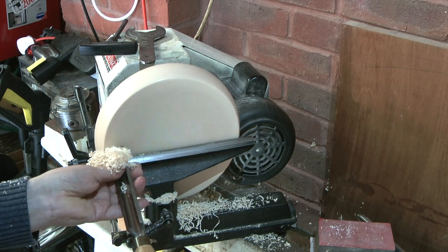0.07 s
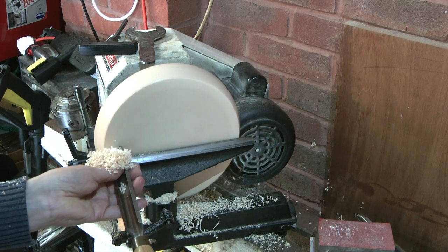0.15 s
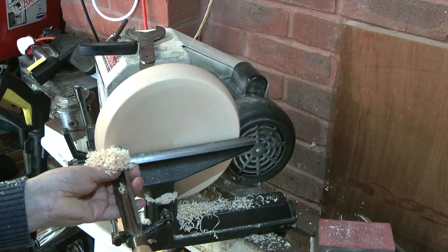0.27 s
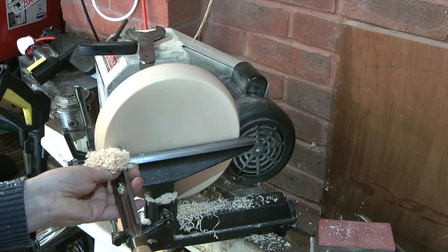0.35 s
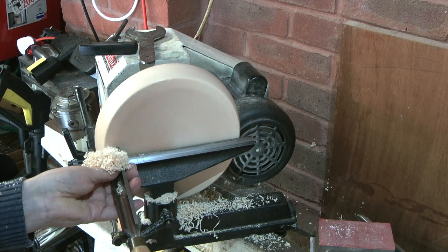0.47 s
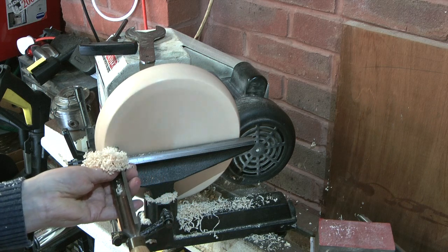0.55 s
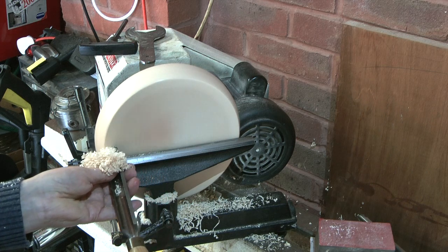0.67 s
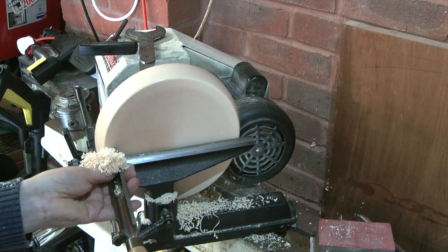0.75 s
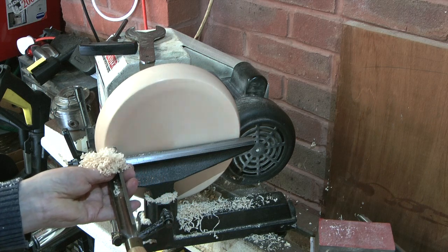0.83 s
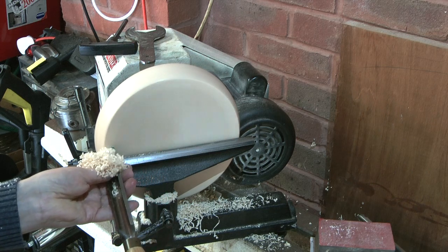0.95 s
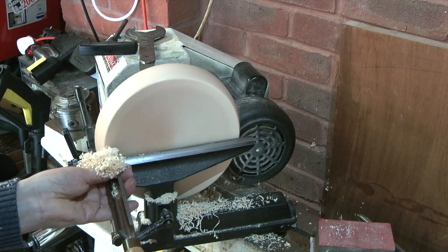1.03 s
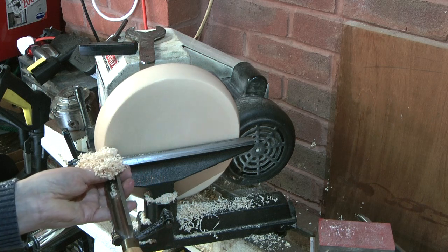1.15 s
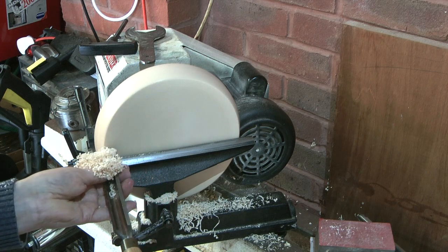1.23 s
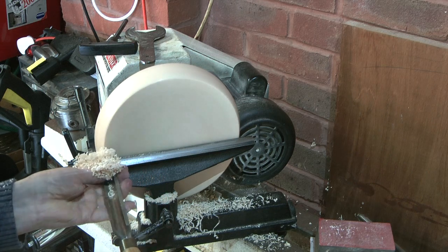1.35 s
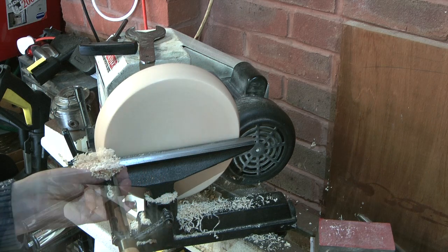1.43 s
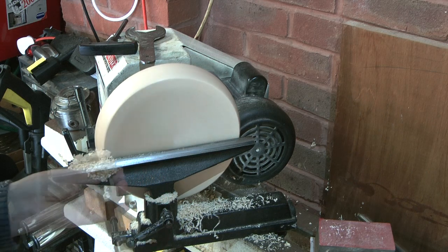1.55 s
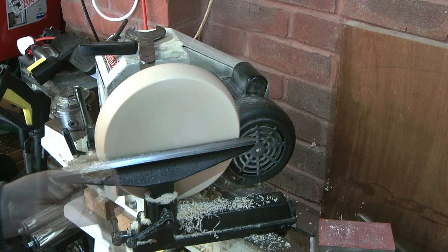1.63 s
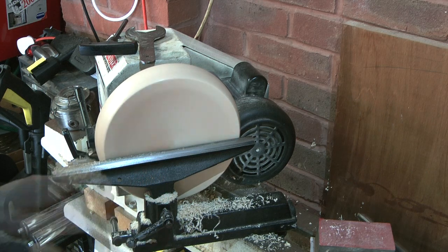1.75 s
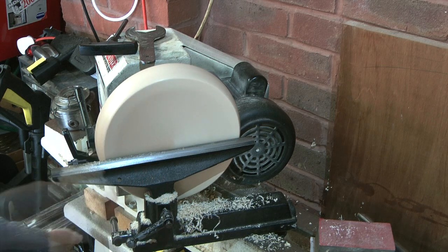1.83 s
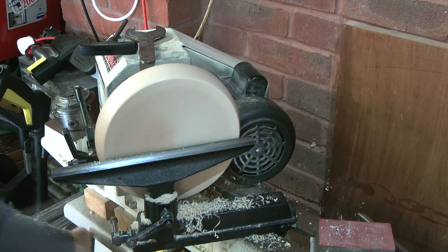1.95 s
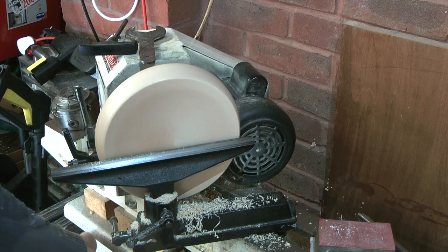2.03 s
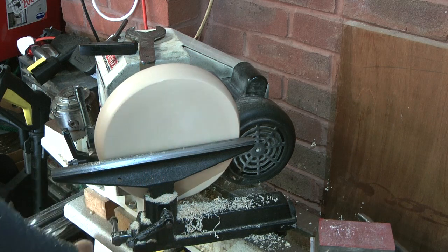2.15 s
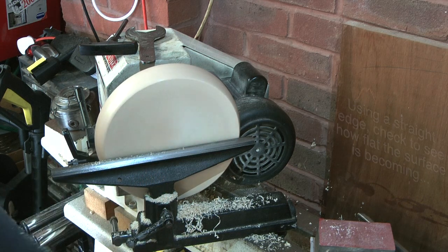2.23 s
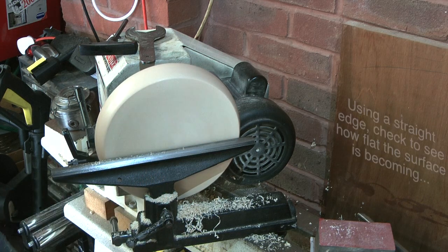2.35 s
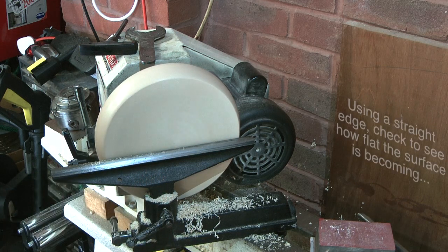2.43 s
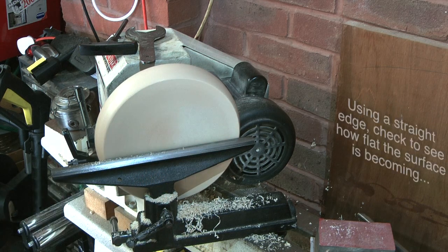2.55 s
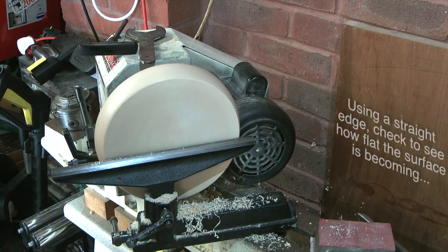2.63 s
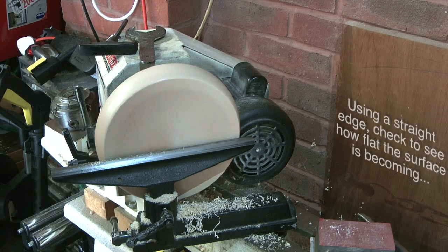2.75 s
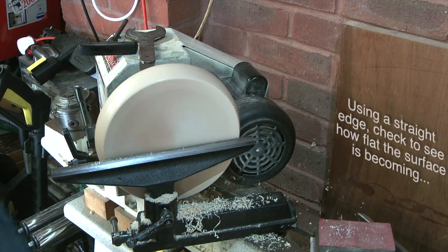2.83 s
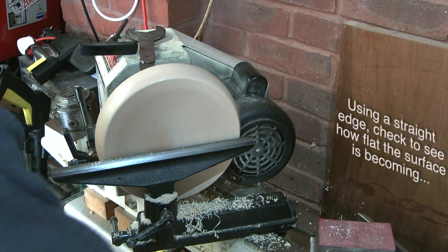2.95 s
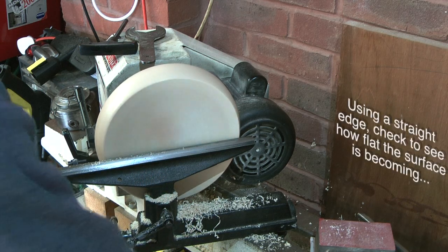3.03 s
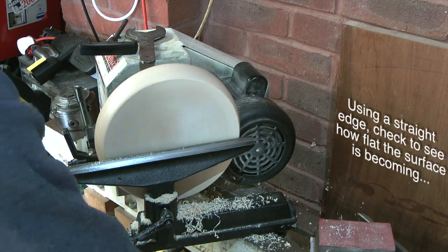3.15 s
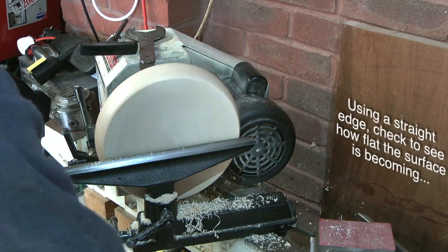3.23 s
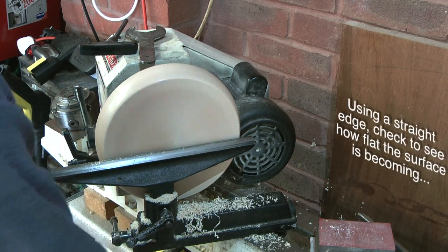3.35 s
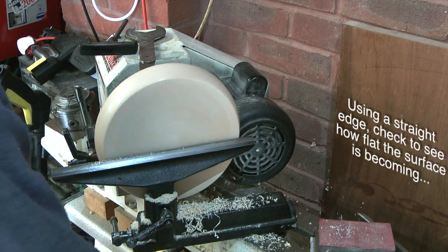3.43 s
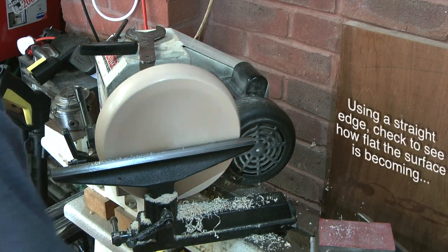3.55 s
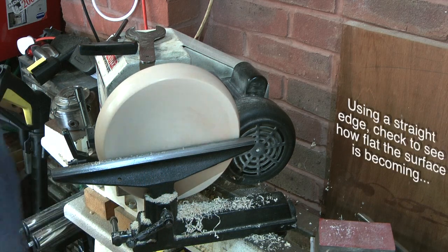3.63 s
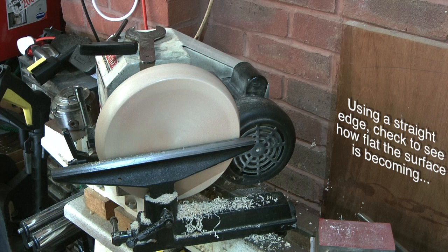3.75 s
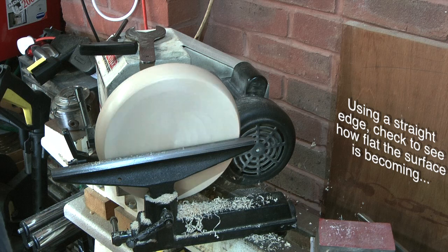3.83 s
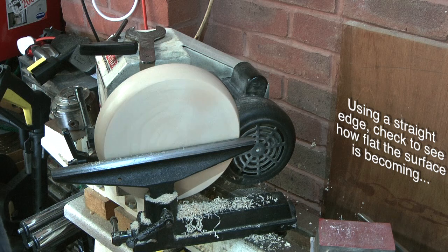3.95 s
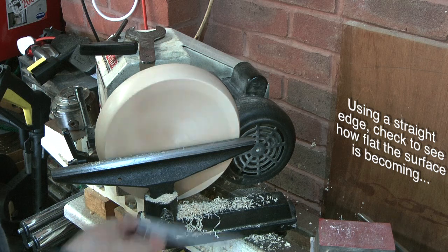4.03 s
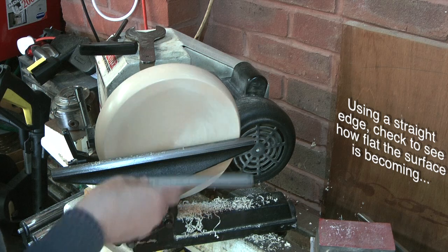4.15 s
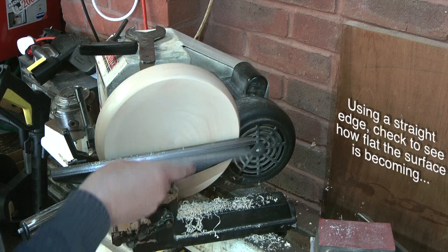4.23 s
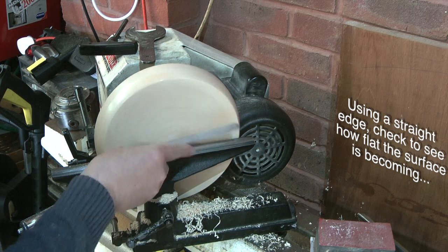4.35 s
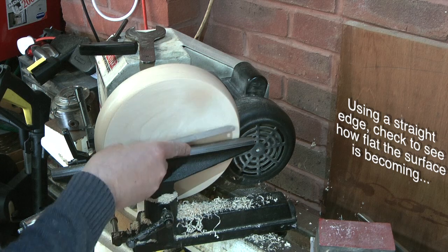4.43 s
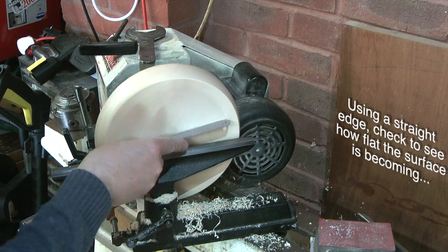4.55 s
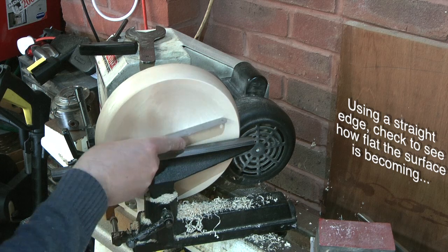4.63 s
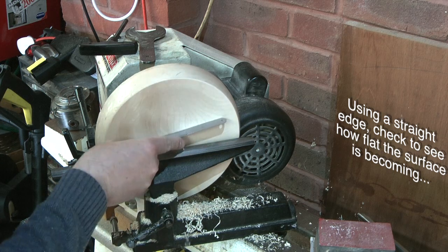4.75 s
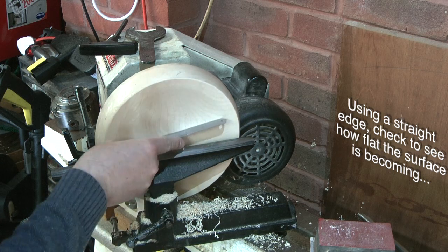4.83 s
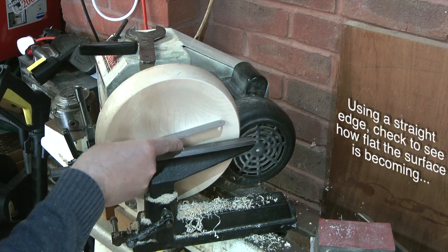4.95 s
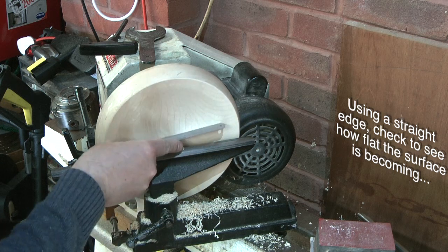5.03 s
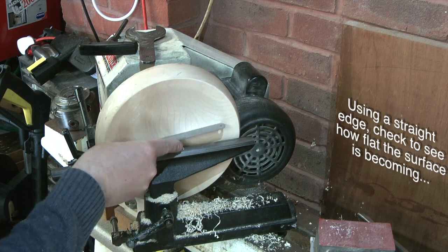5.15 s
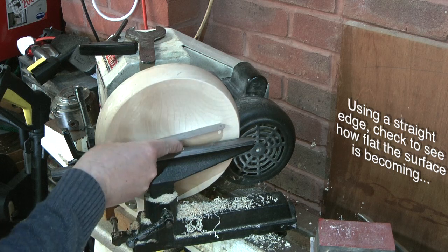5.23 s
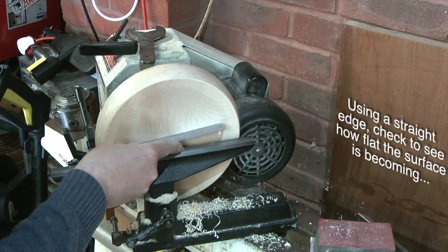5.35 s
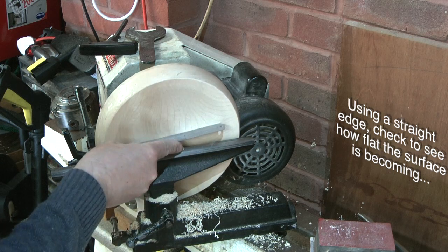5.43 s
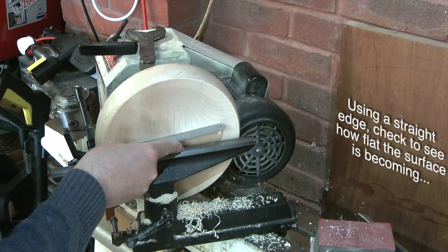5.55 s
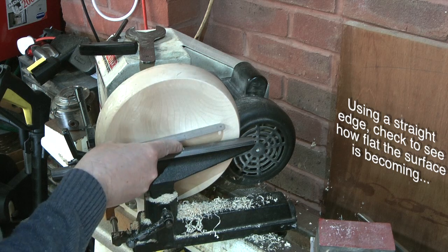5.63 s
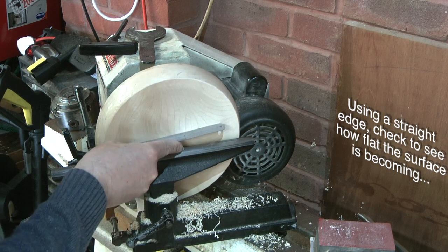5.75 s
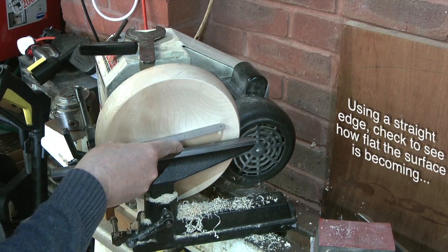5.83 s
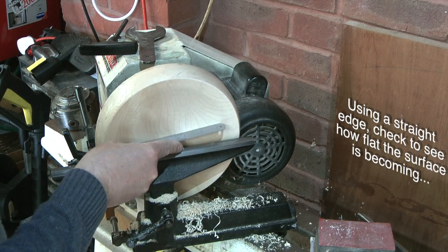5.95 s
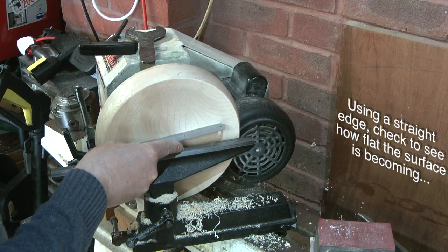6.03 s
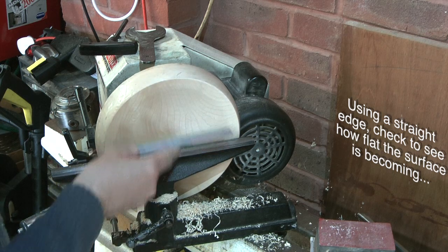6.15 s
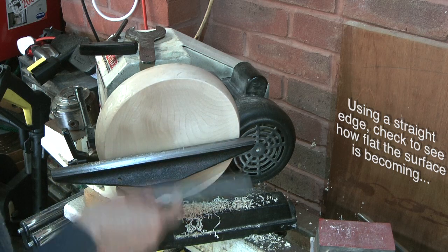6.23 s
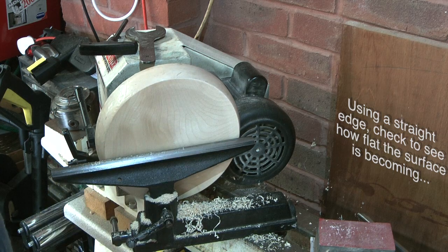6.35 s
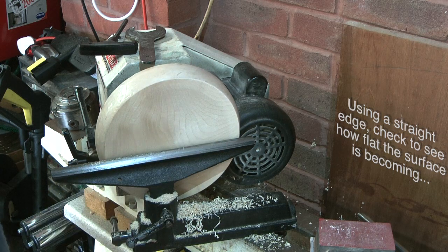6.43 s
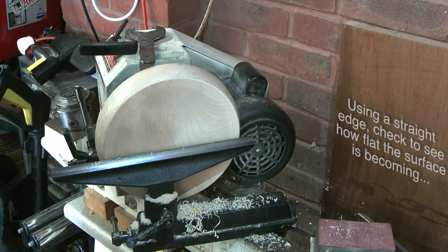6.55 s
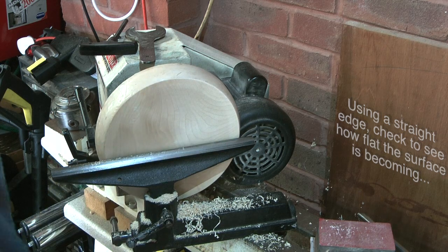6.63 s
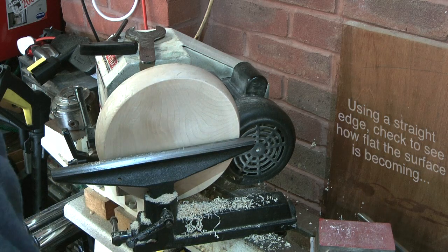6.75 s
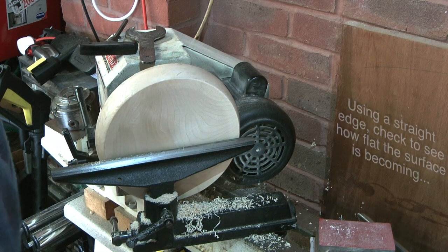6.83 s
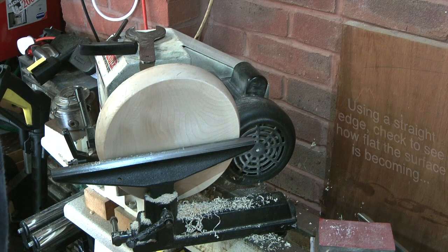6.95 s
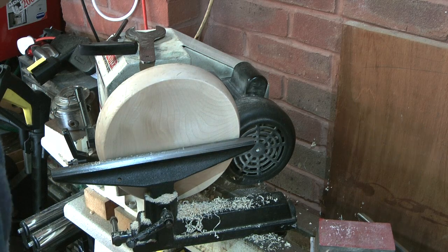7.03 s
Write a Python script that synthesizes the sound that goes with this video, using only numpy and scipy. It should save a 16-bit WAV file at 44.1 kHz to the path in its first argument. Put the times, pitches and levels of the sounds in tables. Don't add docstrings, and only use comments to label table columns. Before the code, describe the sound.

In a small brick workshop, close by, a mains motor hums and rattles while a gouge rips a spinning disc in rapid crisp pulses. Cutting stops, a sleeve brushes the bench, and a switch snaps. The rotor coasts down with falling whines and rumble; a metallic clack begins scrapes that space out until it stops. A steel rule slides and knocks softly on wood, then clatters brightly as it is put away over faint traffic.

```python
import sys
import numpy as np
from scipy import signal
from scipy.fft import rfft, irfft, next_fast_len
from scipy.io import wavfile

SR = 44100
rng = np.random.default_rng(int(sys.argv[2]) if len(sys.argv) > 2 else 0)


def how_loud(loudness_db):
    steps = np.asarray(loudness_db, float) / 20
    return 10 ** steps


def put_to_file(sound):
    columns = np.atleast_2d(sound).T
    safe = np.clip(columns, -1, 1)
    whole_steps = np.round(safe * 32767)
    wavfile.write(sys.argv[1], SR, whole_steps.astype(np.int16))


N = 312228
TIME = np.arange(N) / SR
HZ = np.maximum(np.arange(N // 2 + 1) * SR / N, 1)
OFF_S, DROP_S = 2.25, 2.953
RUN_TURNS_PER_S = 23.1


def noise():
    return rng.standard_normal(N)


def rms_one(x):
    return x / np.sqrt(np.mean(x ** 2) + 1e-20)


def in_time(rows):
    s, *columns = np.transpose(rows)
    return [np.interp(TIME, s, c, left=-120, right=-120) for c in columns]


def at_hz(points, hz):
    point_hz, value = np.transpose(points)
    return np.interp(np.log(hz), np.log(point_hz), value)


def drift(rate_hz):
    r = np.exp(-2 * np.pi * rate_hz / SR)
    return rms_one(signal.lfilter([1], [1, -2 * r, r * r], rng.standard_normal(N + SR))[SR:])


def grains(per_s, spread_db):
    size = how_loud(spread_db * np.minimum(rng.exponential(1, N), 4)) * noise()
    return size * (rng.random(N) < per_s / SR)


def colour(x, tone, rings=(), flicker_db=0., rate=20):
    wide = rfft(x) * how_loud(at_hz(tone, HZ))
    out = irfft(wide, N)
    for hz, width_hz, db in rings:
        resonance = 1 / np.hypot(1, 2 * (HZ - hz) / width_hz) ** 2
        out = out + how_loud(db + flicker_db * drift(rate)) * irfft(wide * resonance, N)
    return rms_one(out)


def strokes(rows, rise_s):
    power = np.zeros(N)
    for s, db, length_s, t60_s in rows:
        a = round(s * SR)
        t = TIME[:min(N - a, SR // 2)]
        fade = how_loud(-60 * np.maximum(t - length_s, 0) / t60_s)
        power[a:a + len(t)] += (how_loud(db) * np.minimum(t / rise_s, 1) * fade) ** 2
    return np.sqrt(power)


def ring(clicks, hz, t60_s):
    r, w = how_loud(-60 / (t60_s * SR)), 2 * np.pi * hz / SR
    return signal.lfilter([0, np.sin(w)], [1, -2 * r * np.cos(w), r * r], clicks + 1e-18)


# start_s, hiss_db, roar_db
TRAFFIC = [(0, -39.5, -64), (3, -39, -50), (5, -40.5, -74), (5.8, -39, -54), (6.4, -39, -47.5),
           (7.08, -37.5, -45)]
# pitch_hz, density_db
TRAFFIC_TONE = [(20, -23), (53, -12), (100, -14), (158, -5), (277, -4.5), (450, -6.5), (800, -2.5),
                (1150, -4.5), (1610, -10), (2600, -23), (5000, -27), (7500, -30.5), (10800, -37),
                (16000, -37)]
# pitch_hz, density_db
ROAR_TONE = [(60, -33), (120, -6), (200, 2), (300, -2), (450, -9.5), (1000, -51)]
# pitch_hz, side_minus_mid_db
TRAFFIC_SIDE = [(25, -1), (60, -9), (110, -12), (200, -13.5), (380, -11), (700, -9), (1290, -8), (2380, -9),
                (4400, -20), (8120, -17), (15000, -20.5)]


def traffic():
    hiss_db, roar_db = in_time(TRAFFIC)

    def road():
        hiss = how_loud(hiss_db) * colour(noise(), TRAFFIC_TONE)
        return hiss + how_loud(roar_db) * colour(noise(), ROAR_TONE)

    mid = road()
    side = irfft(rfft(road()) * how_loud(at_hz(TRAFFIC_SIDE, HZ) + 0.5), N)
    return how_loud(0.87 * drift(17)) * np.array([mid + side, mid - side])


# pitch_hz, t60_s
SHOP_T60_S = [(100, 0.18), (1000, 0.32), (8000, 0.028)]


def workshop(x):
    size = next_fast_len(N + SR)
    hz = np.maximum(np.arange(size // 2 + 1) * SR / size, 1)
    t60_s, sound, out = at_hz(SHOP_T60_S, hz), rfft(x, size), []
    for lags_s in rng.uniform(.009, .04, (2, 10)):
        response = 0
        for k, lag_s in enumerate(lags_s):
            loop = how_loud(-60 * lag_s / t60_s) * np.exp(-2j * np.pi * hz * lag_s)
            response = response + (-1) ** k * loop / (1 - loop)
        out.append(irfft(sound * response, size)[:N])
    return np.array(out)


def early(x):
    out = np.zeros(N)
    for lag in (rng.uniform(.0007, .006, 5) * SR).astype(int):
        out[lag:] += x[:-lag] * rng.choice([-1, 1])
    return how_loud(-21) * out * np.array([[1], [-1]])


# pitch_hz, rms_db
HUM = [(100.1, -28.5), (200.2, -33.5), (300.3, -30.5), (400.4, -24.5), (500.5, -25), (600.6, -26),
       (800.8, -30.5)]
# start_s, hum_db
SUPPLY = [
    (0, -3.5),
    (2.25, -2.5),
    (2.29, -12),
    (2.44, -14),
    (2.5, -67),
    (7.1, -64),
]


def hum():
    lines = np.zeros(N)
    for hz, db in HUM:
        waver_db = .017 * hz ** 0.78 * drift(6)
        lines += np.sqrt(2) * how_loud(db + waver_db) * np.sin(2 * np.pi * (hz * TIME + rng.random()))
    return lines * how_loud(in_time(SUPPLY)[0])


# start_s, level_db
SHAKE = [(0, -16), (.12, -24.5), (.19, -17), (.28, -27.5), (.33, -12.5), (.44, -28), (.5, -16), (.67, -22),
         (.8, -16.5), (.92, -22.5), (.99, -17), (1.17, -22), (1.25, -15.5), (1.35, -22.5), (1.42, -17),
         (1.49, -21), (1.65, -19.5), (1.87, -21.5), (2.0, -18.5), (2.25, -19.5)]
# pitch_hz, density_db
RATTLE_TONE = [(40, -37), (150, -23.5), (200, -13.5), (260, -17), (310, -6), (430, -6), (520, -5),
               (700, -6.5), (980, -4), (1300, -11), (1700, -15), (3000, -63)]
# pitch_hz, width_hz, level_db
FRAME = [(370, 35, 0), (515, 60, 2), (640, 40, 1.5), (790, 70, 6), (925, 20, 2.5), (978, 34, 4.5),
         (1200, 60, 1.5)]


def rattle():
    belt_lap_s, belt_slack_s, dies_db_per_s, split_hz = 0.219, 0.504, 411, 680
    lap = 2 * np.pi * (TIME - belt_slack_s) / belt_lap_s
    belt_db = 0.5 * np.cos(lap) + 1.1 * np.cos(2 * lap + 0.1)
    power_db = belt_db - dies_db_per_s * np.maximum(TIME - OFF_S, 0)
    s, db = np.transpose(SHAKE)
    swing_db = np.interp(TIME, s, db - db.mean())
    low_db = -19.5 + power_db + 0.54 * swing_db + 0.83 * drift(29)
    high_db = -30 + power_db + 1.2 * swing_db + 0.83 * drift(29)
    cycle = 2 * np.pi * HUM[0][0] * TIME
    pull = how_loud(1.7 * np.cos(cycle) + 1.5 * np.cos(2 * cycle) + 0.72 * drift(11))
    shake = colour(pull * noise(), RATTLE_TONE, FRAME, 3.3, rate=10)
    low = signal.sosfilt(signal.butter(2, split_hz, fs=SR, output="sos"), shake)
    high = signal.sosfilt(signal.butter(2, split_hz, "high", fs=SR, output="sos"), shake)
    return how_loud(low_db) * rms_one(low) - how_loud(high_db) * rms_one(high)


def rotor_speed():
    drop_turns_per_s, early_sag_turns_per_s = 17.551, 0.466
    drag_s, friction_turns_per_s2 = 1.1223, 1.937
    halfway = (RUN_TURNS_PER_S + drop_turns_per_s) / 2 - early_sag_turns_per_s
    free = np.interp(TIME, [OFF_S, (OFF_S + DROP_S) / 2, DROP_S], [RUN_TURNS_PER_S, halfway, drop_turns_per_s])
    creep = friction_turns_per_s2 * drag_s
    braked = (drop_turns_per_s + creep) * np.exp(-(TIME - DROP_S) / drag_s) - creep
    return np.maximum(np.where(TIME < DROP_S, free, braked), .01)


def unpowered():
    return how_loud(np.interp(TIME, [OFF_S - .04, OFF_S + 0.024], [-16, 0]))


def whines():
    cycles_per_turn, second_pitch_ratio, overtone, waver_db = 12.9, 1.11, .85, 2.0
    speed = rotor_speed()
    turn = 2 * np.pi * cycles_per_turn * np.cumsum(speed) / SR

    def line(ratio):
        return np.sin(ratio * turn + .4 * drift(25))

    first = how_loud(waver_db * drift(15)) * (line(1) + overtone * line(2))
    second = how_loud(-2 + waver_db * drift(15)) * line(second_pitch_ratio)
    damping_db = np.interp(TIME, [DROP_S, DROP_S + 0.069], [0, -12])
    level = how_loud(-28.5 + damping_db) * unpowered() * (speed / RUN_TURNS_PER_S) ** 3.3
    return level * (first + second)


# start_s, peak_db, length_s, fade_t60_s
DRAG_RUMBLE = [
    (2.95, -28.5, 0.14, 1.6),
]
# pitch_hz, density_db
RUMBLE_TONE = [(35, -61), (60, -32), (198, -10.5), (268, -2), (339, -1.5), (526, 1), (862, -12.5),
               (1470, -10.5), (1600, -56), (2080, -55), (3520, -120)]
# pitch_hz, width_hz, level_db
RUMBLE_RING = [(382, 24, 6), (646, 42, 4), (960, 20, 11)]
# pitch_hz, density_db
HOUSING_TONE = [(340, -40), (366, -21), (372, 4.5), (378, 3), (410, -38)]


def rumble():
    share = rotor_speed() / RUN_TURNS_PER_S
    effort = np.hypot(how_loud(-24.5) * unpowered() * share ** 1.94, strokes(DRAG_RUMBLE, rise_s=0.041))
    rolling = effort * how_loud(-2.5 + 2.1 * drift(11)) * colour(noise(), RUMBLE_TONE, RUMBLE_RING)
    return rolling + how_loud(-41) * share ** 0.71 * colour(noise(), HOUSING_TONE)


# pitch_hz, density_db
BEARING_TONE = [(700, -18), (1100, 1), (1500, 0), (1650, -10), (1900, -3.5), (2900, -13.5), (3400, -16),
                (6500, -25.5), (10000, -36.5), (16000, -58)]
# pitch_hz, width_hz, level_db
BEARING_RING = [(1822, 40, 0.5), (2066, 36, 1.5), (2394, 40, -7), (2580, 32, 7.5), (2690, 72, 0.5),
                (3110, 35, -6), (4300, 170, -3.5), (5470, 230, 1.5)]


def bearing_hiss():
    share = rotor_speed() / RUN_TURNS_PER_S
    level = np.hypot(how_loud(-28.5) * share ** 3.4, how_loud(-46) * share ** 0.3)
    return level * colour(grains(9000, 1.9), BEARING_TONE, BEARING_RING, 4.8)


# start_s, peak_db
TICKS = [(2.329, -38), (2.395, -34), (2.417, -32), (2.445, -29), (2.463, -25), (2.508, -18), (2.553, -25),
         (2.6, -31), (2.649, -28), (2.662, -22), (2.696, -29), (2.7456, -33), (2.8, -37), (2.8286, -38),
         (2.85, -26), (2.9045, -28), (3.285, -24)]
# pitch_hz, level_db, t60_s
TICK_UPPER = [(3250, -24, .025), (4350, -27, .015), (5400, -24.5, .03)]


def loose_tick():
    clicks = np.zeros(N)
    for s, db in list(TICKS) + [(row[0] - .006, -33.5) for row in RUBS[:-1]]:
        clicks[round(s * SR)] = how_loud(db + 7.5)
    body = ring(ring(clicks, 2617, 0.036), 2685, 0.012) * 0.0089
    return body + sum(how_loud(db) * ring(clicks, hz, t60_s) for hz, db, t60_s in TICK_UPPER)


# start_s, peak_db, length_s, fade_t60_s
SHUDDER = [
    (3.15, -41, 0.019, 0.16),
    (3.2, -57.5, 0.59, 1.5),
]
# pitch_hz, density_db
SHUDDER_TONE = [(20, -1), (45, -9), (100, -2), (140, -10), (400, -60)]


def shudder():
    return strokes(SHUDDER, rise_s=0.019) * colour(noise(), SHUDDER_TONE)


# start_s, peak_db, length_s, fade_t60_s
BRUSHES = [(1.55, -28.5, 0.071, .3), (1.81, -23.5, 0.055, .2), (1.955, -19.5, 0.03, 0.09),
           (2.094, -18, 0.056, .15), (2.26, -36, .05, .4)]
# pitch_hz, density_db
BRUSH_TONE = [(1200, -2), (2500, 11), (6500, -3), (7500, -9), (12000, -21), (16000, -33)]
# pitch_hz, width_hz, level_db
BRUSH_RING = [(6500, 350, 1), (4600, 330, -2)]


def brushing():
    return how_loud(-11) * strokes(BRUSHES, rise_s=0.0094) * colour(grains(12000, 1.2), BRUSH_TONE, BRUSH_RING, 3.4)


# start_s, peak_db, length_s, fade_t60_s
SWITCH = [
    (2.008, -18, 0.0095, 0.204),
    (2.188, -25, .004, 0.12),
    (2.2378, -4, 0.0019, 0.044),
    (2.241, -12.5, 0.0065, 0.078),
    (2.245, -19.5, 0.016, 0.37),
]
# pitch_hz, density_db
SWITCH_TONE = [(590, -33.5), (1000, -28), (1290, -11), (1950, -3.5), (3650, -11), (6880, -10.5),
               (7990, -18.5), (13900, -26.5), (15800, -40.5)]


def switch_snap():
    return how_loud(-11) * strokes(SWITCH, rise_s=0.00044) * colour(noise(), SWITCH_TONE)


# start_s, peak_db, length_s, fade_t60_s
DROP = [
    (2.9524, -16, .008, .1),
    (2.9597, -10, 0.014, 0.05),
    (2.978, -8, 0.01, 0.098),
    (3.0, -18, 0.028, 0.27),
]
# pitch_hz, density_db
DROP_TONE = [(290, -40), (500, -18), (737, 0), (1930, -16), (2540, -9), (3580, -12), (4440, -3),
             (5350, -13.5), (9370, -5.5), (10600, -14), (12000, -23), (15500, -19)]
# pitch_hz, width_hz, level_db
DROP_RING = [(2550, 36, 11), (4440, 220, -3), (6000, 480, 6), (6830, 180, 11), (9550, 260, -1),
             (12900, 300, 5), (14600, 400, 3)]


def weights_drop():
    return how_loud(-9.5) * strokes(DROP, rise_s=0.0005) * colour(grains(9000, 0.71), DROP_TONE, DROP_RING, 3.5, rate=24)


# start_s, peak_db
RUBS = [(3.079, -19), (3.143, -20), (3.214, -21.5), (3.292, -23), (3.375, -23.5), (3.472, -22),
        (3.575, -23.5), (3.691, -25), (3.821, -26), (3.976, -27.5), (4.18, -35), (4.437, -27)]
# pitch_hz, density_db
RUB_TONE = [(1500, -31), (2200, -4), (3400, -9.5), (4300, 2.5), (5000, -3.5), (6100, -5), (7200, -3),
            (8400, -5.5), (10500, -7), (11500, -15), (16000, -25)]
# pitch_hz, width_hz, level_db
RUB_RING = [(2144, 34, 15), (3210, 60, 5), (4190, 130, 2), (4440, 140, -1), (2650, 42, 8), (5970, 140, 2),
            (8470, 300, 6.5), (9120, 200, 4), (9900, 400, 0)]


def rubbing():
    speed = rotor_speed()
    bursts = [(s, db, min(.012 + .14 / speed[round(s * SR)], .032), .075) for s, db in RUBS]
    tails = [(s, db - 13, .04, .35) for s, db in RUBS]
    scrape = colour(grains(14000, 1.4), RUB_TONE, RUB_RING, 3.5, rate=50)
    return how_loud(-12.5 + drift(80)) * strokes(bursts + tails, rise_s=.003) * scrape


# start_s, peak_db
CRACKS = [(2.9613, -16), (2.9665, -16), (2.976, -8), (2.988, -20), (6.5748, -24), (6.6591, -22),
          (6.6631, -22), (6.7773, -30), (6.8432, -31), (6.8492, -23), (6.9125, -27)]
# pitch_hz, density_db
CRACK_TONE = [(2000, -30), (5000, -13), (9000, 6), (14000, -2), (20000, -4)]


def cracks():
    return how_loud(-9) * strokes([(s, db, 0, .02) for s, db in CRACKS], rise_s=.0002) * colour(noise(), CRACK_TONE)


# start_s, peak_db, free_share (of the free ringing time, 0-1)
TAPS = [(3.243, -25, 0.8), (3.252, -18, 0.2), (6.661, -21, 0.8), (6.687, -15.5, 0.3), (6.699, -17, 0.35),
        (6.728, -27, 0.5), (6.781, -42, 0.5), (6.837, -21, 0.5), (6.847, -10, 0.44), (6.861, -21, 0.96),
        (6.874, -19, 0.53), (6.911, -22.5, 0.56)]
# pitch_hz, level_db, t60_s
RULE = [(6970, -1, 0.48), (7134, 8, 0.18), (7600, -8, .3), (7500, 3, 0.2), (7900, -6, .25), (8280, -3, 0.3),
        (8457, -9, 0.33), (8812, -10, 0.34), (9410, -3.5, 0.37), (9814, -14, .2), (10170, -11, 0.22),
        (10890, -13, 0.23), (12000, -10, 0.22), (12960, -18, .2), (13660, -13, 0.25), (14230, -18, .15),
        (14940, -19, .2)]


def rule_taps():
    out = np.zeros(N)
    for hz, db, t60_s in RULE:
        chatter = how_loud(5 * drift(50))
        for s, tap_db, free in TAPS:
            a = round(s * SR)
            t = TIME[:min(N - a, SR // 2)]
            grip_db = -8 if hz > 8600 and s < 6.75 else 0
            level_db = tap_db + db + grip_db - 14.5 + 1.8 * rng.standard_normal()
            rung = how_loud(level_db - 60 * t / (free * t60_s)) * np.sin(2 * np.pi * hz * t)
            out[a:a + len(t)] += rung * np.minimum(t / 0.0023, 1) * chatter[a:a + len(t)]
    return out


# start_s, peak_db, length_s, fade_t60_s
SLIDES = [(3.245, -20.5, 0.035, 0.12), (3.612, -26, 0.033, 0.12), (4.24, -45, .03, 0.086),
          (4.30, -45, .02, .1), (4.549, -37, 0.088, 0.31), (4.615, -37, 0.13, .1),
          (4.741, -31, 0.033, 0.28), (5.074, -42, 0.034, .1), (6.32, -49, .05, .1), (6.575, -10, .003, .05),
          (6.58, -15, .003, 0.074), (6.6, -32, 0.029, .3), (6.659, -13.5, .008, 0.44),
          (6.69, -19, 0.016, 0.58), (6.838, -18, 0.0083, 0.078), (6.846, -22, 0.0072, 0.39)]
# pitch_hz, density_db
SLIDE_TONE = [(1500, -12), (3500, -19), (5600, -16.5), (6600, -12), (7300, -4), (8500, -13), (10500, -12.5),
              (13000, -18), (16000, -29)]
# pitch_hz, width_hz, level_db
SLIDE_RING = [(7240, 190, 2), (7700, 123, -2), (8150, 144, -1), (9100, 220, -3)]


def rule_slides():
    hiss = colour(grains(9000, 1.5), SLIDE_TONE, SLIDE_RING, 2.1, rate=15)
    return how_loud(-14.5) * strokes(SLIDES, rise_s=0.0009) * hiss


# start_s, peak_db, length_s, fade_t60_s
KNOCKS = [(4.548, -27, .008, 0.11), (4.57, -37.5, 0.13, 0.11), (4.738, -33, 0.021, 0.23),
          (4.745, -38.5, 0.083, .15), (5.4, -43, .02, .1), (6.575, -24.5, 0.0058, 0.16),
          (6.659, -34, 0.006, 0.12), (6.67, -38, 0.049, 0.51), (6.838, -26, 0.0085, 0.08)]
# pitch_hz, density_db
KNOCK_TONE = [(300, -7), (800, 11), (1700, 3.5), (2700, 0), (5000, -4), (8000, -5), (11500, -31),
              (16000, -26)]


def wood_knocks():
    return how_loud(-8) * strokes(KNOCKS, rise_s=0.00056) * colour(grains(9000, 0.42), KNOCK_TONE)


# start_s, pitch_hz, peak_db, t60_s
NOTES = [(2.954, 4540, -18.5, .13), (2.978, 4520, -19, 0.06), (2.99, 3330, -41, .45), (2.985, 688, -25, .4),
         (2.99, 798, -27.5, .3), (4.73, 2050, -36, .07), (4.549, 2560, -41, .1), (4.731, 2380, -37, .08),
         (4.729, 1680, -37, .06), (6.577, 1700, -27.5, .08), (6.659, 4010, -29, 0.07),
         (6.659, 6200, -30, .05), (6.66, 4737, -39, .14), (6.578, 1050, -27, .06), (6.576, 5997, -31, .04),
         (6.78, 7550, -37, .7), (6.72, 7050, -33, .5), (6.842, 7550, -24, .12), (6.838, 786, -37, .12),
         (6.66, 2740, -36, .18), (6.695, 4500, -40, .15), (6.839, 1645, -30, 0.07), (6.838, 2680, -34, .07),
         (6.845, 6272, -29, 0.21), (3.16, 392, -32, .8), (4.45, 2170, -45, .45), (4.19, 4200, -50, .15),
         (3.812, 2620, -47, .5), (3.835, 2190, -47, .4), (4.148, 2640, -48, .35), (4.615, 7650, -52, .8),
         (4.615, 6950, -53, .8), (4.305, 7250, -49, .08), (6.77, 10160, -38, .14), (6.777, 11890, -39, .17),
         (6.777, 12980, -43, .12), (6.777, 9340, -40, .25), (6.777, 8834, -43, .2),
         (6.844, 13000, -34, .04), (6.838, 10300, -33, .04), (6.844, 15000, -38, .04),
         (6.66, 4350, -33, .1), (6.661, 5150, -35, .08), (6.662, 5600, -36, .08), (6.911, 10890, -39, .08),
         (6.909, 10000, -40, .04), (6.578, 1300, -29, .05), (6.577, 5200, -33, .06)]


def struck_notes():
    out = np.zeros(N)
    for s, hz, db, t60_s in NOTES:
        a = round(s * SR)
        t = TIME[:min(N - a, SR // 2)]
        out[a:a + len(t)] += how_loud(db - 60 * t / t60_s) * np.sin(2 * np.pi * hz * t) * np.minimum(t / .001, 1)
    return out * how_loud(1.1 * drift(70))


# start_s, level_db
SHAVING = [(0.0, -23), (0.804, -28.5), (1.126, -28.5), (1.206, -28), (1.348, -33), (1.7, -48)]
# start_s, peak_db, body_db (under the hiss)
BITES = [(0.0149, -15.5, -9), (0.0464, -19.5, -10), (0.0934, -20, -14), (0.1196, -13.5, -9),
         (0.191, -16, -15), (0.2324, -26, -15), (0.2618, -15, -9), (0.3057, -19, -11), (0.3346, -19, -9),
         (0.374, -26, -8), (0.404, -19.5, -3.5), (0.4434, -28, -2), (0.4743, -17, -4.5), (0.5194, -24, -8),
         (0.5457, -17, -5.5), (0.5874, -29, -2), (0.621, -18, -6), (0.6619, -25, -12),
         (0.6903, -17.5, -5.5), (0.7324, -22.5, -3), (0.7594, -23.5, -1), (0.8056, -37, -11),
         (0.8315, -17.5, -9), (0.8744, -33, -6), (0.9083, -15, -8.5), (0.9494, -28, -5),
         (0.9792, -20.5, -11), (1.0136, -26.5, -1), (1.048, -13.5, -10), (1.0844, -20.5, -6),
         (1.1194, -20, -7), (1.1608, -23, -12), (1.1906, -18, -5.5), (1.2284, -27.5, -1),
         (1.2625, -19.5, -6), (1.3009, -28, -8), (1.337, -26, -0.5)]
# pitch_hz, density_db
CUT_TONE = [(1300, -12), (2600, -2.5), (3000, -6.5), (5000, -4.5), (6400, -9.5), (7850, -10), (9000, -9),
            (11500, -12.5), (14600, -19.5), (16000, -13)]
# pitch_hz, width_hz, level_db
GOUGE = [(3605, 10, -3), (3830, 7.1, -2), (4920, 19, 1.5), (5230, 17, -6), (5890, 28, -1.5), (6210, 21, 0),
         (6500, 30, -1), (8930, 23, 0), (9920, 56, -7.5), (10530, 30, -8), (13300, 86, -16),
         (14400, 100, -9)]
# pitch_hz, width_hz, level_db
TEAR_ZONES = [(2565, 45, 7.5), (2690, 39, 1), (7500, 560, -23), (11300, 1000, -10), (12800, 1000, -7),
              (14000, 970, 3)]


def gouge():
    hold_s, t60_s, rise_s, split_hz = 0.013, .05, 0.0034, 7300
    rings = [(hz, 3 * width_hz, db + 7.5) for hz, width_hz, db in GOUGE] + list(TEAR_ZONES)
    steady = how_loud(in_time(SHAVING)[0] - 2) * colour(grains(20000, .7), CUT_TONE, rings, 3.5, rate=60)
    bright = strokes([(s - .005, db - 9.5, hold_s, t60_s) for s, db, body_db in BITES], rise_s)
    deep = strokes([(s - .005, db + body_db - 4, hold_s, t60_s) for s, db, body_db in BITES], rise_s)
    tearing = colour(grains(10000, 1.3), CUT_TONE, rings, 4, rate=12)
    low = signal.sosfilt(signal.butter(3, split_hz, "low", fs=SR, output="sos"), tearing)
    high = signal.sosfilt(signal.butter(3, split_hz, "high", fs=SR, output="sos"), tearing)
    tilted = np.diff(high, prepend=0)
    return steady + deep * rms_one(low) + bright * rms_one(tilted)


def scene():
    body = rattle() + whines() + rumble() + bearing_hiss() + loose_tick() + shudder()
    cut = gouge()
    switch = brushing() + switch_snap() + weights_drop() + rubbing() + cracks()
    rule = rule_taps() + rule_slides() + wood_knocks() + struck_notes()
    ears = np.array([[-1], [1]])
    rule_pan_db = np.where(TIME > 6.45, 1.1, -.1)
    direct = hum() * how_loud(1.8 * ears) + body * how_loud(0.5 * ears) + cut * how_loud(0.17 * ears)
    direct = direct + switch * how_loud(0.93 * ears) + rule * how_loud(rule_pan_db * ears)
    reverberant = workshop(how_loud(-18) * body + how_loud(-43) * cut + how_loud(-18) * switch + how_loud(-22) * rule)
    reflected = early(body + how_loud(-17) * (cut + switch + rule))
    return direct + reverberant + reflected + traffic()


def band_limit(x):
    return signal.sosfilt(signal.butter(12, 16710, fs=SR, output="sos"), x)


def record(dry):
    rounded = 1.411 * np.tanh(dry / 1.597)
    top_cut = signal.ellip(14, 1, 50, 15850, fs=SR, output="sos")
    return band_limit(signal.sosfilt(top_cut, rounded))


dry = scene()
out = record(dry)
put_to_file(out)
```